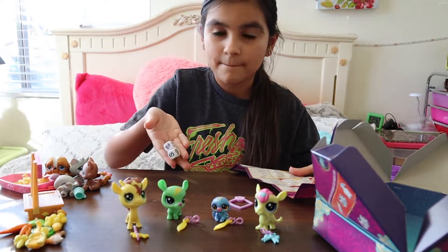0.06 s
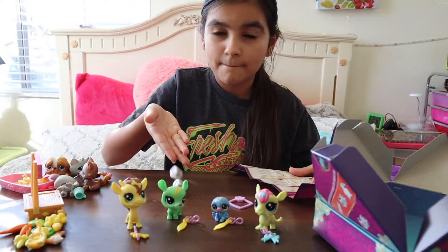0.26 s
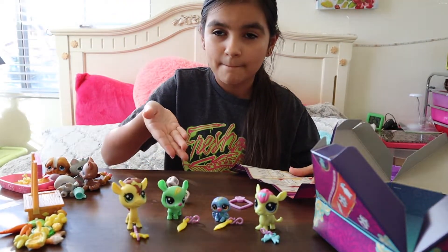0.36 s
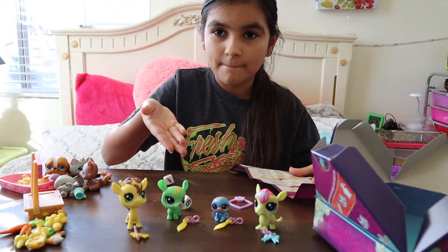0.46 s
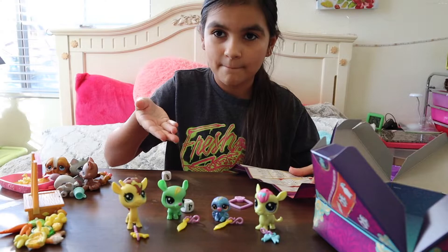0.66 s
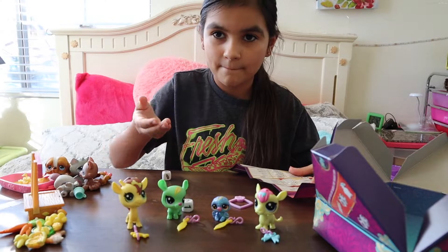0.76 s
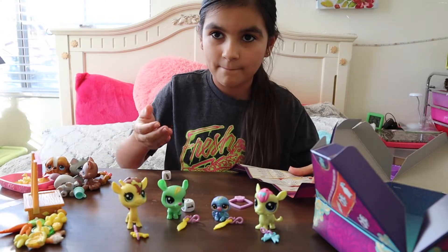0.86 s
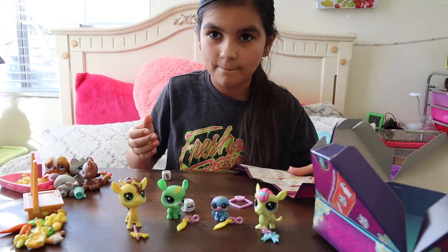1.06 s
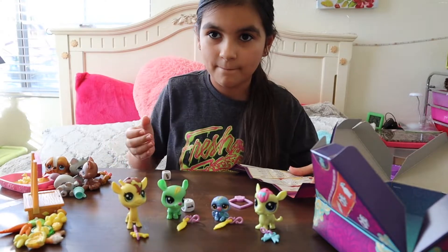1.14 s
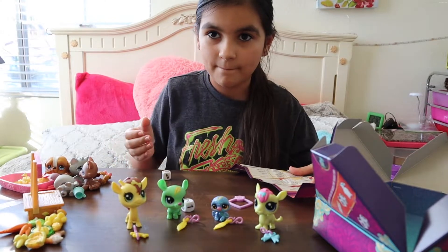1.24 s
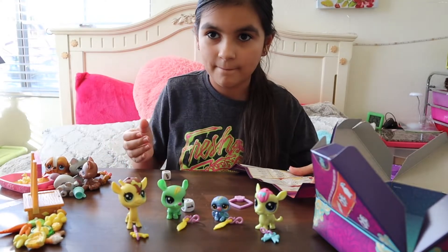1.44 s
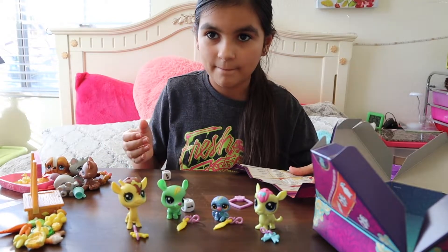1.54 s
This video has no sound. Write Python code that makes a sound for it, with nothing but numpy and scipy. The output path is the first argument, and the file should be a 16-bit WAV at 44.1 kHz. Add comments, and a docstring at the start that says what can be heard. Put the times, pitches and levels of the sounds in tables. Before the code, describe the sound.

Close up and a little to the left, small hard dice strike a wooden tabletop, bounce rapidly and rattle out in under a second; afterwards only faint ticks and soft room hush remain in a small bedroom.

```python
"""A quiet, furnished bedroom: two small plastic dice are thrown on a wooden table, left of two microphones.
Each bounce is a sharp tick, a short clack falling in pitch and a duller knock of the table top's modes.
Tumbles are quick noise-driven bursts of contacts; rolling is a random patter on the same modes.
The loudest blows clip. A few faint ticks and bumps, made of filtered noise, come before, during and after.
Fresh noise tails give the room's reply, and shaped stereo noise its steady hush."""
import sys
import numpy as np
from scipy import signal
from scipy.fft import rfft, irfft, next_fast_len
from scipy.io import wavfile
from scipy.ndimage import uniform_filter1d

SR = 44100
rng = np.random.default_rng(int(sys.argv[2]) if len(sys.argv) > 2 else 0)


def persist_wave(psi):
    """Save psi, clipped to +-1, as 16-bit WAV."""
    counts = np.round(np.clip(psi, -1, 1) * 32767).astype(np.int16)
    wavfile.write(sys.argv[1], SR, np.atleast_2d(counts).T)


N = 70560  # samples, 1.6 s


# Clean bounces of the dice on the table, levels before room and microphones. Each row: start in seconds,
# clack peak in dB, then knock, edge ring and tick in dB over the clack, and the clack's final pitch in Hz.
BOUNCES = [(0.2423, 1.5, -17.5, 9, 4.5, 1855), (0.3074, -18, -8.5, -3, 7, 2480),
           (0.3112, 3, -18, -6.5, -3.5, 1720), (0.3205, -1.5, -15, 5.5, -0.5, 1900),
           (0.376, -5.5, -16, -8.5, -10, 1890), (0.4096, -7, -17.5, -12.5, -12, 2010),
           (0.4279, -9.5, -12.5, -20, -26, 2000), (0.4453, -11, -21, -19.5, -14, 2200),
           (0.4548, -12.5, -11.5, -12, -27, 2140), (0.459, -15.5, -11.5, -7, -9, 2220),
           (0.4732, -21.5, -7, -16, -26, 2210)]
ONSET_S = .0006  # added to every start


def bounces():
    """A bounce is one contact, which sets off the clack and every ringing part together."""
    single_contact = lambda: [1.]
    hits = [(s + ONSET_S, blow(clack(hz), single_contact, *levels)) for s, *levels, hz in BOUNCES]
    return lay_in_room(hits, ROOM_DB)


# Tumbles on the table, levels before room and microphones. Each row: start in seconds, clack peak in dB,
# then knock, edge ring and tick in dB over the clack, and length in seconds (at least 1 ms is played).
TUMBLES = [(0.3496, -18, 0.5, 9, 7, 0.0034), (0.5348, -19, -4, 9.5, 3.5, 0.011),
           (0.5819, -32.5, -3.5, 13, -3, 0.0082), (0.5985, -24, 5, 15, 10, 0.0045),
           (0.6297, -32.5, 4, 17.5, 15, 0.0035), (0.6755, -22.5, -6, 6.5, 11.5, 0.0035),
           (0.7669, -32, -3, 4.5, -8, 0.0047), (0.7782, -41.5, 7, 14, -1, 0.0059),
           (0.7917, -37, -17, 15, -21, 0.0022), (0.8057, -35, -2, 10.5, -16, 0.0027),
           (0.814, -31.5, 2, 10, 5, 0.0018), (0.826, -39, 1, 12.5, -9.5, 0.0047),
           (0.8335, -36, 7, 8, -24, 0.0044), (0.8436, -29, -1, 8.5, -9.5, 0.002),
           (0.848, -30, 0.5, 7.5, 0, 0.00094)]
# The clack's modes for tumbles and rolling, nominal before scatter.
# Each row: pitch in Hz, relative level in dB, 60 dB decay time in seconds, attack time constant in seconds.
CLACK_MODES = [(2000, 0, .0036, .0005), (2500, -4, .003, .0004)]
SWELL_SKEW = 0.69  # below 1 the swell peaks early


def tumbles():
    """A tumble is a swell of many tiny contacts, drawn as spiky noise, that drives the modes."""
    t = np.arange(600) / SR

    def swell(length):
        progress = np.clip(t / max(length, .001), 0, 1)
        return np.sin(np.pi * progress ** SWELL_SKEW) * rng.standard_normal(600) ** 3

    hits = [(s, blow(ring(CLACK_MODES), lambda: swell(length), *levels))
            for s, *levels, length in TUMBLES]
    return lay_in_room(hits, ROOM_DB)


SWEEP_FROM, SWEEP_S = 2.306, 0.0003  # starting over final pitch; time constant of the fall in seconds
CLACK_S, CLACK_SKEW = 0.0019, 0.66  # length in seconds; below 1 the swell peaks early


def clack(hz):
    """A bending wave in the table top: its highs arrive first, so a few cycles fall in pitch to hz."""
    t = np.arange(200) / SR
    cycles = hz * (t + (SWEEP_FROM - 1) * SWEEP_S * (1 - np.exp(-t / SWEEP_S)))
    swell = np.sin(np.pi * np.clip(t / CLACK_S, 0, 1) ** CLACK_SKEW) ** 2
    return swell * np.sin(2 * np.pi * cycles)


# What rings at the table: the table top, the die edges and the sharp tick, nominal before scatter.
# Each row: pitch in Hz, relative level in dB, 60 dB decay time in seconds, attack time constant in seconds.
TABLE_MODES = [(118.4, -13.5, 0.037, 0.00071), (309, -11, 0.043, 0.0015), (634.6, -7.5, 0.031, 0.00082),
               (975, -5.5, 0.019, 0.00016), (1086, -5, 0.016, 0.00066), (1353, -5.5, 0.027, 0.0017),
               (1571, 0.5, 0.017, 0.00094)]
EDGE_MODES = [(2735, -6, 0.0042, 0.00024), (3074, 4.5, 0.0039, 0.00021), (3642, 4.5, 0.0043, 0.0002),
              (4070, 3, 0.0033, 0.00018), (4700, 0.5, 0.0045, 0.00057)]
TICK_MODES = [(5910, 5, 0.0037, 0.00016), (7177, 6.5, 0.0025, 0.0001), (8620, 1, 0.0054, 0.00043),
              (11130, -2, 0.0028, 0.00022)]


def blow(body, contacts, db, knock_db, edge_db, tick_db):
    """Contacts sound the clack and ring table top, die edges and the tick, each to its own peak level."""
    padded_body = np.pad(body, (0, SR // 12 - len(body)))
    parts = [(padded_body, 0), (ring(TABLE_MODES), knock_db),
             (ring(EDGE_MODES), edge_db), (ring(TICK_MODES), tick_db)]
    rung = [(np.convolve(x, contacts()), level_db) for x, level_db in parts]
    return sum(amp(db + level_db) * x / abs(x).max() for x, level_db in rung)


MODE_SCATTER_DB, PITCH_SCATTER = 1.5, .03  # standard deviations; pitch as a fraction


def ring(modes):
    """One blow on a set of decaying modes, each a little different every time."""
    t = np.arange(SR // 12) / SR
    total = np.zeros(len(t))
    for hz, db, t60, rise in modes:
        level_luck, pitch_luck = rng.standard_normal(2)
        decay = amp(db + MODE_SCATTER_DB * level_luck - 60 * t / t60)
        attack = (1 - np.exp(-t / rise)) ** 2
        total += decay * attack * np.sin(2 * np.pi * hz * (1 + PITCH_SCATTER * pitch_luck) * t)
    return total


# The dice rolling on the table, joined by straight lines in dB. Each row: time in seconds, level of the
# table patter in dB, then edge ring, clack and low hum of the table in dB over that patter.
ROLL = [(0.247, -25.5, -1, -3.5, -7.5), (.27, -42.5, -51, 2, 4.5), (0.302, -36, 15, 2, -13),
        (0.331, -33.5, 3.5, -1, -16.5), (.41, -38.5, 6.5, 1, -1.5), (0.47, -38, 3.5, 3, 0.5),
        (0.526, -37, -22, -11.5, -11), (0.56, -37, -0.5, 0, -23.5), (0.65, -34.5, 2, -16, -15.5),
        (0.709, -39, 3.5, -5.5, 0.5), (.74, -42.5, -11, -1.5, -14), (0.802, -39, -5, -11, -29),
        (.862, -41, 6.5, 7, -6)]
ROLL_PER_S, ROLL_SCATTER_DB = 1400, 3.5  # mean taps per second in each of seven layers; their spread
ROLL_TICK_DB, ROLL_ROOM_DB = -10, -7  # tick against edge ring; room tail against the direct roll
ROLL_FADE_S = 0.0077


def rolling():
    """Edges and corners patter on the table at random, ringing the same modes softly."""
    s, level_db, edge_db, clack_db, hum_db = np.transpose(ROLL)
    t = np.arange(N) / SR
    on = (t > s[0]) * np.clip((s[-1] - t) / ROLL_FADE_S, 0, 1)
    gain = lambda db: amp(np.interp(t, s, db))

    def taps():
        hits = (rng.random(N) < ROLL_PER_S / SR) * rng.standard_normal(N)
        return hits * amp(ROLL_SCATTER_DB * rng.standard_normal(N))

    def patter(modes):
        return unit(sum(signal.fftconvolve(taps(), ring(modes))[:N] for _ in range(7)))

    bright = patter(EDGE_MODES) + amp(ROLL_TICK_DB) * patter(TICK_MODES)
    sound = patter(TABLE_MODES[3:])  # upper table modes
    sound = sound + gain(hum_db) * patter(TABLE_MODES[2:3])  # one lower table mode
    sound = sound + gain(clack_db) * patter(CLACK_MODES) + gain(edge_db) * bright
    dry = on * gain(level_db) * sound
    return dry, amp(ROLL_ROOM_DB) * room(dry)[:, :N]


# Faint ticks and bumps, levels before room and microphones.
# Each row: start in seconds, peak in dB, band centre in Hz.
FAINT = [(0.037, -39.5, 7170), (0.1005, -48.5, 5860), (0.745, -38, 11400), (0.977, -41, 11350),
         (1.0075, -34, 10700), (1.339, -47.5, 426), (1.445, -49, 770)]
FAINT_T60_S, FAINT_RISE_S = .014, 0.0036  # 60 dB decay time and attack time constant of the noise
FAINT_ROOM_DB = -1.5  # room tail against the direct tick


def faint_ticks():
    """Tiny ticks and soft bumps of small things being handled, as bursts of band-passed noise."""
    t = np.arange(600) / SR
    hits = []
    for s, db, hz in FAINT:
        envelope = amp(-60 * t / FAINT_T60_S) * (1 - np.exp(-t / FAINT_RISE_S))
        burst = envelope * rng.standard_normal(600)
        band = lambda f: (1j * f * .35 * hz / (hz * hz - f * f + 1j * f * 0.36 * hz)) ** 2
        tick = filtered(burst, band)
        hits.append((s, amp(db) * tick / abs(tick).max()))
    return lay_in_room(hits, FAINT_ROOM_DB)


# How fast the bedroom dies away. Each row: frequency in Hz, 60 dB decay time in seconds.
ROOM_DECAY = [(150, 1), (600, 0.2), (2000, 0.39), (5000, 0.32), (12000, 0.25)]
# The room tail at the two microphones. Each row: frequency in Hz, left-right likeness (held to -1..1).
ROOM_ALIKE = [(200, 1), (700, -1.2), (1300, -0.1), (2400, -0.51), (4400, -0.51), (15000, -1.1)]
ROOM_DB = -13  # tail against the direct bounces and tumbles
ROOM_GAP_S, ROOM_BUILD_S = .003, 0.0026  # silence before the tail; time constant of its build-up


def room(x):
    """A fresh stereo noise tail for x; each frequency dies at its own speed."""
    hz, t, z = signal.stft(rng.standard_normal((2, SR // 3)), SR, nperseg=128)
    decay = amp(-60 * t / along(ROOM_DECAY, hz)[:, None])
    build = 1 - np.exp(-t / ROOM_BUILD_S)
    noise = signal.istft(z * build * decay, SR, nperseg=128)[1]
    tail = alike_pair(noise, ROOM_ALIKE)
    tail = np.pad(tail / np.linalg.norm(tail[0]), ((0, 0), (round(ROOM_GAP_S * SR), 0)))
    return signal.fftconvolve(x[None], tail, axes=1)


def lay_in_room(hits, room_db):
    """Lay (start, sound) hits into a direct track, each with its own room tail in a stereo track."""
    dry, wet = np.zeros(N), np.zeros((2, N))
    for s, x in hits:
        add(dry, x, s)
        add(wet, amp(room_db) * room(x), s)
    return dry, wet


# Colour of the bedroom's hush. Each row: frequency in Hz, relative density in dB per Hz.
HUSH = [(12, -45.5), (20, -11.5), (76, -4.5), (160, -3), (387, -4), (940, -5), (11400, -26.5), (15000, -28)]
# The hush at the two microphones. Each row: frequency in Hz, left-right likeness.
HUSH_ALIKE = [(60, 1), (240, -0.1), (950, -0.65), (3770, -0.43), (15000, -0.98)]
HUSH_DB, HUSH_PATCH_DB = -50.5, 1  # RMS level before the input; RMS depth of the patches


def hush():
    """The steady air of the room: shaped noise, with slight patches in time and frequency."""
    z = signal.stft(rng.standard_normal((2, N)), nperseg=512)[2]
    field = rng.standard_normal(z.shape[1:])
    for axis in (0, 1):
        field = uniform_filter1d(field, size=6, axis=axis)
    pair = signal.istft(z * amp(HUSH_PATCH_DB * unit(field)), nperseg=512)[1][:, :N]
    coloured = filtered(alike_pair(pair, HUSH_ALIKE), lambda hz: amp(along(HUSH, hz)))
    return amp(HUSH_DB) * unit(coloured)


def amp(db):
    """Decibels to an amplitude factor."""
    return 10 ** (np.asarray(db) / 20)


def unit(x):
    """Scale x to an RMS of one."""
    return x / np.sqrt(np.mean(x ** 2) + 1e-20)


def along(points, hz):
    """Interpolate (Hz, value) points on a log frequency axis."""
    f, v = np.transpose(points)
    return np.interp(np.log(hz + 1), np.log(f + 1), v)


def filtered(x, response):
    """Multiply the spectrum of x by a complex response of frequency."""
    m = next_fast_len(x.shape[-1] + 8192)
    spectrum = rfft(x, m) * response(np.fft.rfftfreq(m, 1 / SR))
    return irfft(spectrum, m)[..., :x.shape[-1]]


def alike_pair(pair, alike):
    """Mix two unrelated noises into left and right of a given likeness."""
    def shares(hz):
        turn = np.arccos(np.clip(along(alike, hz), -1, 1)) / 2
        return np.array([np.cos(turn), np.sin(turn)])

    mid, side = filtered(pair, shares)
    return np.array([mid + side, mid - side])


def add(mix, x, s):
    """Lay x into mix from time s in seconds, cut at the end of mix."""
    part = mix[..., round(s * SR):][..., :x.shape[-1]]
    part += x[..., :part.shape[-1]]


# The table lies left of the two microphones.
# Each row: frequency in Hz, phase lead of left over right in radians.
LEFT_LEADS = [(100, .05), (700, .4), (1640, .85), (2600, 1.4), (4500, 2.2), (7000, 2.1), (16000, 2.4)]
BASS_CUT_HZ = 130


def scene():
    """Direct sound reaches the left microphone first; the room comes from all round."""
    sources = [bounces(), tumbles(), rolling(), faint_ticks()]
    dry, wet = (sum(part) for part in zip(*sources))
    half_lead = np.array([[.5], [-.5]])
    direct = filtered(dry, lambda hz: np.exp(1j * half_lead * along(LEFT_LEADS, hz)))
    small = lambda hz: (1j * hz / (BASS_CUT_HZ + 1j * hz)) ** 2  # small things radiate little deep bass
    return filtered(direct + wet, small) + hush()


CLIP_TOP, CLIP_HARD = 1, 8  # full scale; a higher exponent makes a sharper knee
TREBLE_CUT_HZ, TOP_HZ, EDGE_HZ = 11800, 16344, 500  # droop corner, band limit, width of the final slope


def record(dry):
    """The input clips at full scale; the top treble droops and nothing is kept above the band limit."""
    clipped = dry / (1 + abs(dry / CLIP_TOP) ** CLIP_HARD) ** (1 / CLIP_HARD)

    def treble(hz):
        droop = (1 + (hz / TREBLE_CUT_HZ) ** 10) ** -.5
        return droop * np.sin(np.pi / 2 * np.clip((TOP_HZ - hz) / EDGE_HZ, 0, 1)) ** 2

    return np.clip(filtered(clipped, treble), -CLIP_TOP, CLIP_TOP)


dry = scene()
out = record(dry)
persist_wave(out)
```